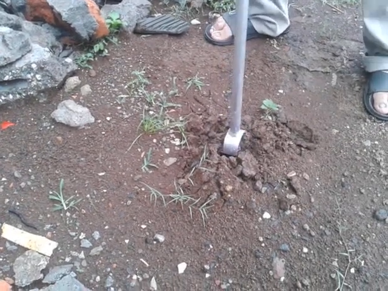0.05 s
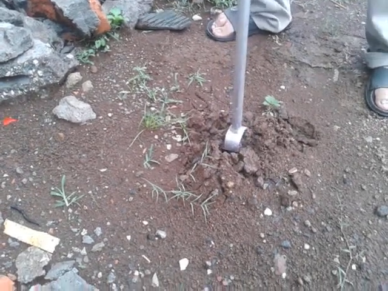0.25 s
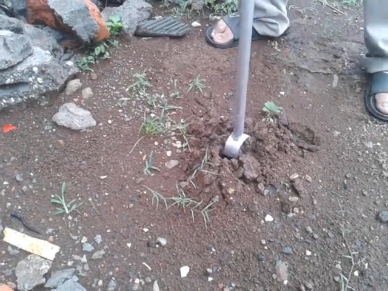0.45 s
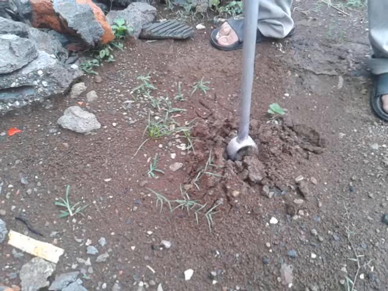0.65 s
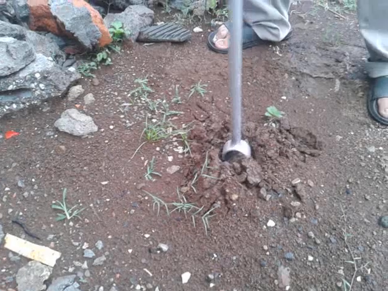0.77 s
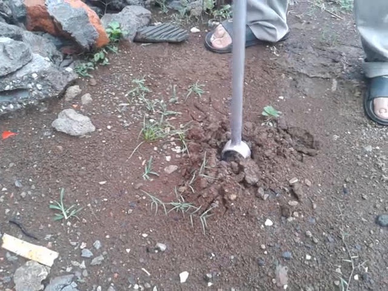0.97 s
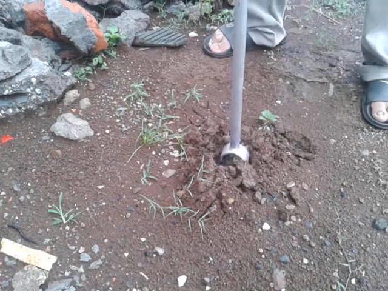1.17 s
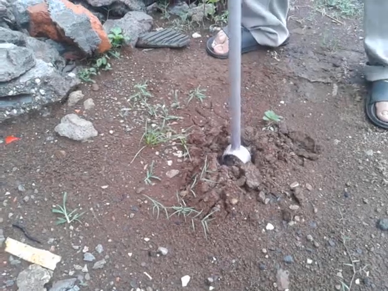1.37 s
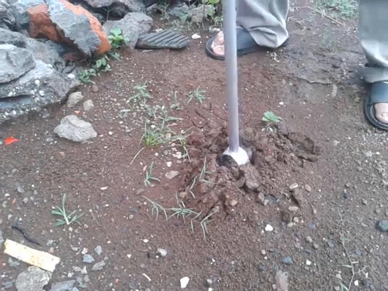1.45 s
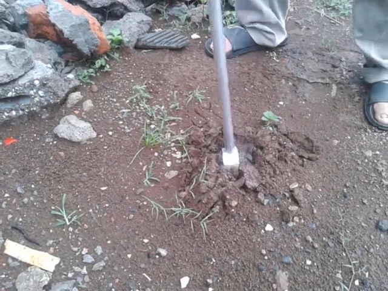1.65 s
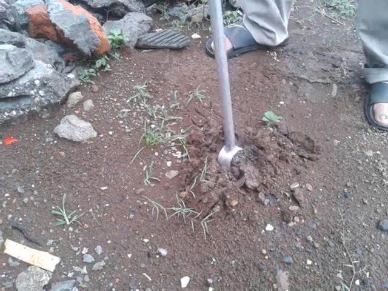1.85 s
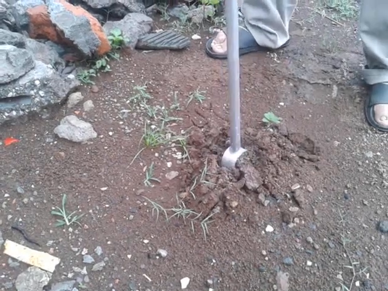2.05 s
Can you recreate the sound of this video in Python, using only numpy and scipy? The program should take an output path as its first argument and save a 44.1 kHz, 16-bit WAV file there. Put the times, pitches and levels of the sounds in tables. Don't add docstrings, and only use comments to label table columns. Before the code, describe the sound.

Close, dry crunching of a metal auger turned in loose earth, beginning with creaky clicks, then two bursts of scraping, the second stronger and ringing, in open air with steady hiss and a faint distant engine.

```python
import sys
import numpy as np
from scipy import signal
from scipy.io import wavfile

SR = 44100
rng = np.random.default_rng(int(sys.argv[2]) if len(sys.argv) > 2 else 0)


def how_loud(loudness_db):
    steps = np.asarray(loudness_db, float) / 20
    return 10 ** steps


def generate_wav(signal):
    frames = np.transpose(np.atleast_2d(signal))
    scaled = np.clip(frames, -1, 1) * 32767
    pcm = np.round(scaled).astype(np.int16)
    wavfile.write(sys.argv[1], SR, pcm)


N = 92610

# pitch_hz [Hz], level_db [dB], t60_s [s]
STEEL_MODES = [(480, -6, .06), (990, -3, .06), (1300, -8, .05), (1800, -6, .06), (2180, -3, .08),
               (2800, -10, .12), (3420, -3, .2), (3790, -8, .15), (4010, -14, .12), (4790, -6, .06),
               (5110, -15, .1), (5750, -6, .1), (6480, -8, .12), (6980, -6, .1)]


def rms_one(x):
    return x / np.sqrt(np.mean(x ** 2) + 1e-20)


def drift(rate_hz):
    r = np.exp(-80 * np.pi * rate_hz / SR)
    chance = rng.standard_normal(N // 40 + 2002)
    slow = signal.lfilter([1], [1, -2 * r, r * r], chance)[2000:]
    return np.interp(np.arange(N) / 40, np.arange(len(slow)), rms_one(slow - slow.mean()))


def resonance(x, hz, width_hz):
    r = np.exp(-np.pi * width_hz / SR)
    feedback = [1, -2 * r * np.cos(2 * np.pi * hz / SR), r * r]
    return signal.lfilter(np.array([1, 0, -1]) * (1 - r * r) / 2, feedback, x + 1e-18)


def ring(x, hz, t60_s):
    r = how_loud(-60 / (t60_s * SR))
    w = 2 * np.pi * hz / SR
    return signal.lfilter([0, np.sin(w)], [1, -2 * r * np.cos(w), r * r], x + 1e-18)


def cut(x, hz, kind, order=2):
    return signal.sosfilt(signal.butter(order, hz, kind, fs=SR, output="sos"), x)


def coloured(x, spectrum, patchy_db=0.):
    edges_hz = 50 * 2 ** np.arange(0, 7.9, 1 / 3)
    hz, db = np.transpose(spectrum)
    centres_hz = edges_hz[:-1] * 2 ** (1 / 6)
    total = np.zeros(N)
    for k, level_db in enumerate(np.interp(np.log(centres_hz), np.log(hz), db)):
        flicker = how_loud(level_db + patchy_db * drift(3.5))
        total += flicker * cut(x[k % len(x)], edges_hz[k:k + 2], "band")
    return total


def grains(per_s, spread_db):
    sizes = how_loud(spread_db * np.minimum(rng.exponential(1, N), 4)) * rng.choice([-1, 1], N)
    return rms_one(sizes * (rng.random(N) < per_s / SR))


def background():
    # pitch_hz [Hz], level_db [dB per Hz]
    air_spectrum = [(60, -4.5), (200, 2), (480, -17), (1000, -12), (1700, -10), (2800, -8), (3800, -12),
                    (7500, -9)]
    # pitch_hz [Hz], level_db [dB rms]
    engine_orders = [
        (75, -50),
        (149, -55.5),
    ]
    # time_s [s], level_db [dB]
    nearness = [(0, -1.5), (.25, -4.5), (.45, 1.5), (.8, 2), (1.2, 0), (1.6, 0.5), (2.1, -3.5)]
    # low_hz, high_hz [Hz]
    roar_band_hz = [122, 840]
    t = np.arange(N) / SR
    air = how_loud(-46.5) * rms_one(coloured(rng.standard_normal((2, N)), air_spectrum, patchy_db=.5))
    engine = np.zeros(N)
    for hz, db in engine_orders:
        level = np.sqrt(2) * how_loud(db + 1.5 * drift(4))
        engine += level * np.sin(2 * np.pi * hz * t + .8 * drift(3))
    roar = rms_one(cut(rng.standard_normal(N), roar_band_hz, "band"))
    engine += how_loud(-50 + 1.2 * drift(9)) * roar
    return air + how_loud(np.interp(t, *np.transpose(nearness))) * engine


def whines():
    whine_lines = [(353, 36, -61), (480.4, 27, -60), (2960, 110, -60.5), (4055, 65, -63.5), (5310, 23, -64),
                   (5980, 36, -65), (6900, 75, -67)]
    total = np.zeros(N)
    for hz, width_hz, db in whine_lines:
        once = resonance(rng.standard_normal(N), hz, width_hz)
        total += how_loud(db) * rms_one(resonance(once, hz, width_hz))
    return total


def scraping():
    # time_s [s], level_db [dB]
    effort_curve = [(0, -57), (.3, -48), (.4, -46.5), (.56, -53), (.62, -41), (.68, -46.5), (.78, -50.5),
                    (.86, -44), (.93, -52.5), (1.38, -60.5), (1.44, -45.5), (1.6, -45.5), (1.67, -41),
                    (1.73, -35), (1.8, -42), (1.86, -44.5), (2.1, -51)]
    unsteady_db = 0.8 * drift(22)
    effort = how_loud(np.interp(np.arange(N) / SR, *np.transpose(effort_curve)) + unsteady_db)
    grit = np.array([grains(2500, 4.5), grains(2500, 4.5)])
    return grit, effort


def steel_ringing(strikes, rub, effort):
    total = np.zeros(N)
    for k, (hz, db, t60_s) in enumerate(STEEL_MODES):
        scrape = how_loud(-37.5) * effort * np.roll(rub, 997 * k)
        total += how_loud(db) * ring(strikes[k] + scrape, hz, t60_s)
    return total


def snaps():
    # start_s [s], peak_db [dB], creak_db [dB re the snap], creak_length_s [s]
    snap_events = [
        (0.2235, -5, -26, 0.03),
        (.2394, -25, -5, 0.008),
        (0.282, -37.5, 3, 0.04),
        (0.2964, -8, -23, 0.02),
    ]
    # start_s [s], peak_db [dB]
    slip_events = [(.2052, -29), (.2115, -28), (.2133, -24), (.2157, -30), (.2178, -23), (.2192, -18),
                   (.2209, -20), (.2224, -20), (.2275, -29), (.2288, -29), (.2375, -29), (.2728, -29),
                   (.278, -29), (.2798, -30), (.2928, -24), (.2937, -24), (.295, -25)]
    gain_db, ring_hz, width_hz = 8.5, 6750, 1200
    t = np.arange(N) / SR
    creak = grains(550, 1.7)
    clicks, swell, slips = np.zeros((3, N))
    for s, db, creak_db, lead_s in snap_events:
        clicks[int(s * SR)] = how_loud(db + gain_db)
        rise = np.clip(1 - (s - t) / lead_s, 0, 1) ** 1.5
        swell += how_loud(db + creak_db) * rise * np.exp(-np.maximum(t - s, 0) / 0.003)
    for s, db in slip_events:
        slips[int(s * SR)] = how_loud(db + gain_db)
    hard = clicks * (clicks > how_loud(-6 + gain_db))
    rebound = how_loud(-3.5) * np.roll(hard, int(0.000905 * SR))
    snap = 2 * resonance(clicks + rebound + slips, ring_hz, width_hz)
    snap = snap + how_loud(-3.5) * cut(clicks, 5000, "high")
    return snap + 2 * resonance(cut(creak * swell, 4500, "high"), ring_hz, width_hz)


def crunches():
    # start_s [s], peak_db [dB], colour_hz [Hz], t60_s [s]
    crunch_events = [(0.416, -35, 520, 0.034), (0.593, -30, 4800, 0.016), (0.5985, -26.5, 1820, 0.025),
                     (0.5992, -28, 890, 0.025), (.5978, -23, 4800, 0.014), (.5985, -28, 6700, .015),
                     (0.6065, -28, 4000, .02), (0.6072, -23, 6300, .022), (.6155, -29, 5500, .02),
                     (.623, -28.5, 1460, 0.023), (.631, -29, 5000, .02), (0.6352, -27, 920, 0.035),
                     (.635, -27, 1750, .025), (.652, -30, 850, .03), (0.6354, -24, 4740, .025),
                     (.636, -26, 6400, .02), (.639, -26, 2400, 0.04), (.640, -27, 6000, .025),
                     (0.6428, -29, 1400, 0.04), (0.6473, -22, 4860, 0.02), (.648, -24, 6500, .03),
                     (.648, -26.5, 1730, 0.043), (0.658, -26.5, 5400, 0.032), (.697, -37, 5460, 0.028),
                     (.8145, -30, 4600, .02), (0.822, -24, 4100, 0.03), (0.8216, -19.5, 5400, 0.025),
                     (.8225, -27, 7200, .015), (.826, -33, 710, 0.032), (0.858, -34, 4300, 0.027),
                     (.85, -32, 6800, .04), (0.8716, -22.5, 5400, 0.025), (.873, -28, 7200, .015),
                     (0.894, -32, 4500, 0.018),
                     (1.423, -31, 2580, 0.02), (1.436, -30.5, 497, 0.076), (1.4552, -29, 5700, .03),
                    (1.485, -32, 5200, .03), (1.528, -31, 5800, .03), (1.549, -30, 4800, .03),
                    (1.468, -29, 4140, 0.088), (1.5089, -25.5, 5870, 0.03), (1.534, -27.5, 3300, 0.037),
                    (1.544, -28, 1320, 0.074), (1.553, -32, 1900, 0.036), (1.5885, -25, 2200, 0.017),
                    (1.628, -31, 2200, .03), (1.6556, -18.5, 2100, .03), (1.656, -28, 900, .025),
                    (1.6642, -27, 2000, 0.015), (1.668, -29, 5900, 0.04), (1.6905, -24, 2150, 0.04),
                    (1.7025, -26, 6800, .02), (1.7042, -24, 480, 0.025), (1.7177, -19, 1100, 0.015),
                    (1.7188, -19, 500, 0.025), (1.719, -27, 280, .03), (1.721, -21, 440, 0.02),
                    (1.7198, -26, 6900, .03), (1.7208, -27, 3400, .02), (1.7257, -11, 3000, 0.022),
                    (1.726, -16, 6400, 0.03), (1.7265, -20, 1000, .03), (1.7285, -19, 2200, .04),
                    (1.7372, -21, 950, 0.05), (1.7378, -18, 3250, 0.018), (1.742, -21, 2400, .015),
                    (1.7505, -25, 3300, .02), (1.7684, -28, 750, .03), (1.7712, -25, 1000, .025),
                    (1.7735, -25, 2700, .015), (1.783, -28, 800, .03), (1.7918, -25, 900, 0.027),
                    (1.7922, -21, 2260, 0.021), (1.7913, -21, 5060, 0.018), (1.7915, -23, 6500, .03),
                    (1.7915, -29.5, 3420, 0.023), (1.76, -28, 3400, .04), (1.764, -29, 6400, .05),
                    (1.779, -29, 4800, .03), (1.8, -30, 4200, .04)]
    events = crunch_events
    colour_q, length = 3.1, SR // 8
    t = np.arange(length) / SR
    crumbs = grains(9000, 3.2)
    burst, tinted = np.zeros((2, N))
    strikes = np.zeros((len(STEEL_MODES), N))
    modes_hz = np.array(STEEL_MODES)[:, 0]
    luck_db = rng.normal(0, 0.93, (len(events), len(STEEL_MODES)))
    for (s, db, hz, t60_s), mode_luck_db in zip(events, luck_db):
        i = int(s * SR)
        shape = how_loud(db - 5.5 - 60 * t / max(t60_s, .003))
        burst[i:i + length] += shape * how_loud(-13.5)
        grit = crumbs[::-1][i:i + length] * shape
        grit[0] = shape[0] * how_loud(4) * np.sqrt(SR * colour_q / (np.pi * hz))
        tone = resonance(resonance(grit, hz, hz / colour_q), hz, 2 * hz / colour_q)
        tinted[i:i + length] += tone * shape[0] / np.abs(tone).max()
        near_db = -6.0 * np.log2(modes_hz / hz) ** 2
        strikes[:, i] += how_loud(db - 38 + mode_luck_db + near_db)
    return crumbs * burst, tinted, strikes


def digging():
    # pitch_hz [Hz], level_db [dB per Hz]
    soil_spectrum = [(150, -2), (450, 3), (1000, 1.5), (1500, -1.5), (2300, 2), (4300, -5.5), (7500, -5)]
    grit, effort = scraping()
    crumbs, tinted, strikes = crunches()
    norm = np.std(coloured(grit, soil_spectrum))
    soil = coloured(grit * effort + crumbs, soil_spectrum) / norm
    return soil + tinted + steel_ringing(strikes, grit[0], effort)


def singing():
    sung_notes = [(.74, .18, 4010, -59), (.66, .2, 2850, -59), (1.08, .3, 2800, -59),
                  (1.33, .16, 2770, -55), (1.17, .17, 1410, -58), (1.46, .17, 3400, -54),
                  (1.652, .045, 3422, -44.5), (1.61, .11, 3792, -54), (1.71, .2, 3420, -50.5),
                  (1.656, .011, 7000, -50), (1.669, .017, 7000, -48), (1.691, .015, 6950, -49),
                  (1.7258, .01, 7000, -35), (1.735, .016, 7000, -45), (1.737, .018, 970, -36),
                  (1.79, .06, 2180, -53), (1.835, .075, 2075, -52), (1.86, .18, 2770, -54),
                  (1.9, .14, 2950, -56)]
    width_hz = 23
    t = np.arange(N) / SR
    waver = how_loud(1.5 * drift(width_hz) + 1.8 * drift(160))
    wander = 1.1 * drift(width_hz / 2)
    total = np.zeros(N)
    for s, length_s, hz, db in sung_notes:
        swell = np.abs(np.sin(np.pi * np.clip((t - s) / length_s, 0, 1))) ** 0.36
        total += np.sqrt(2) * how_loud(db) * swell * waver * np.sin(2 * np.pi * hz * t + wander)
    return total


def scene():
    near = cut(snaps() + digging() + singing(), 7490, "low", order=6)
    return (near + background() + whines())[None]


def low_pass(x):
    return signal.sosfilt(signal.butter(12, 9480, fs=SR, output="sos"), x)


def record(dry):
    # low_hz, high_hz [Hz]
    mirror_band_hz = [8080, 8960]
    inner_rate_hz, image_lead_s = 16000, .0015
    bright = dry + (how_loud(10.5) - 1) * resonance(dry, 7000, 3700)
    x = cut(bright, 195.4, "high", order=4)
    x = x + how_loud(-91) * rms_one(cut(rng.standard_normal(N), 70, "low"))
    mirrored = x * np.cos(2 * np.pi * inner_rate_hz * np.arange(N) / SR)
    image = cut(mirrored, mirror_band_hz, "band", order=8)
    x = signal.sosfilt(signal.cheby1(10, .5, 7058, fs=SR, output="sos"), x)
    return low_pass(x + how_loud(-26) * np.roll(image, -int(image_lead_s * SR)))


dry = scene()
out = record(dry)
generate_wav(out)
```